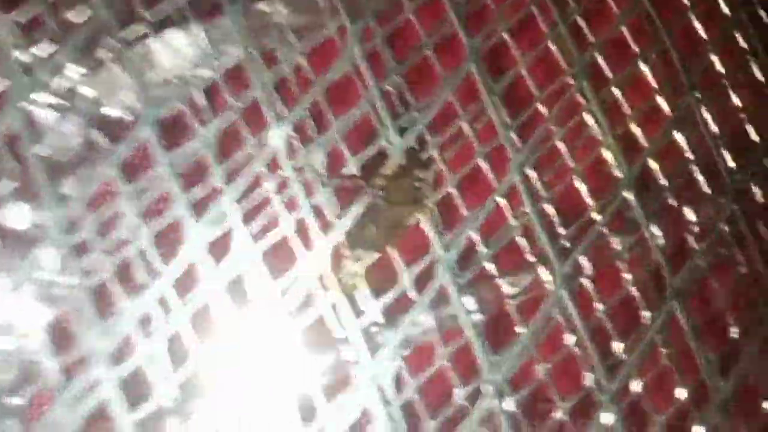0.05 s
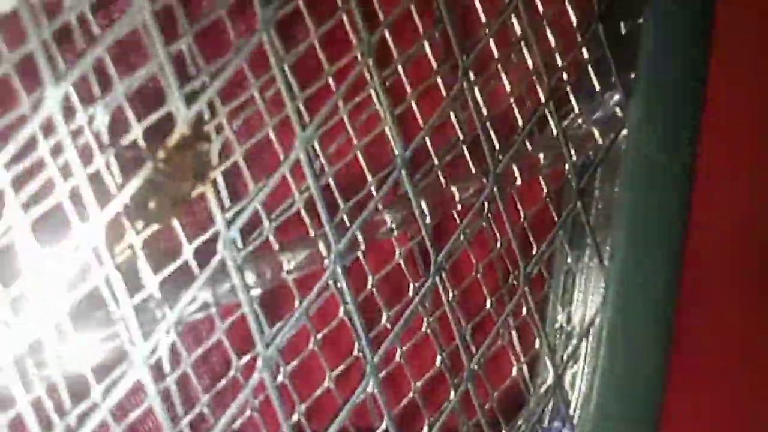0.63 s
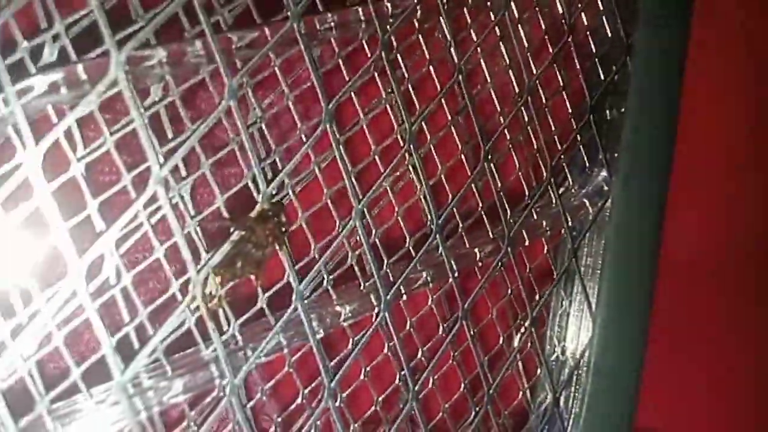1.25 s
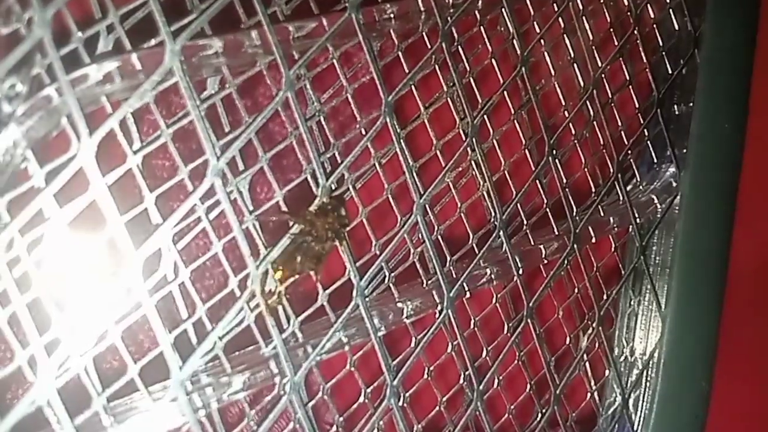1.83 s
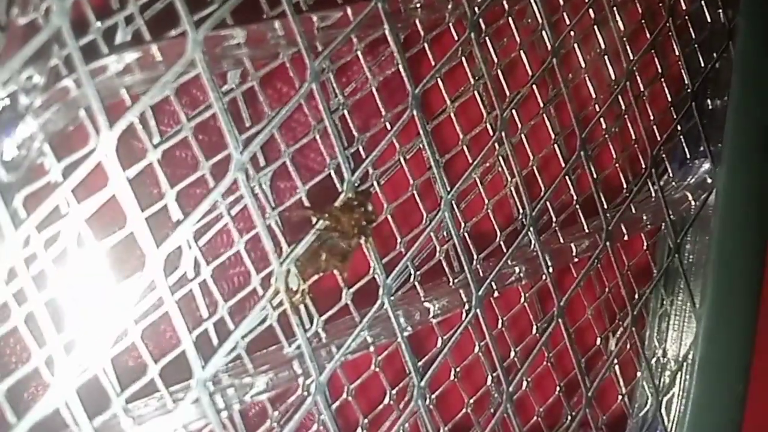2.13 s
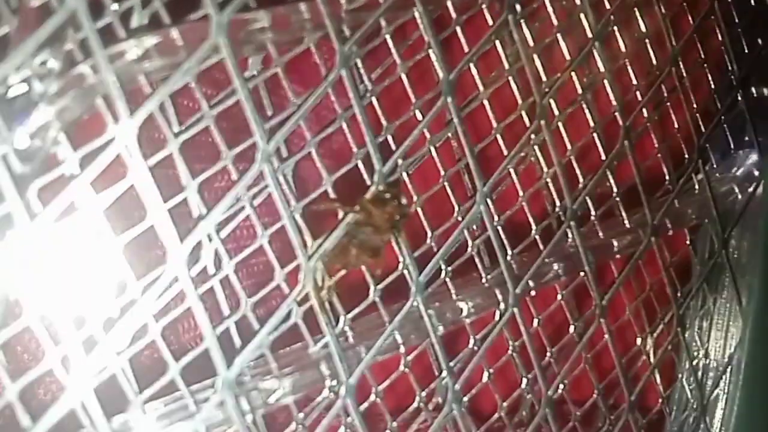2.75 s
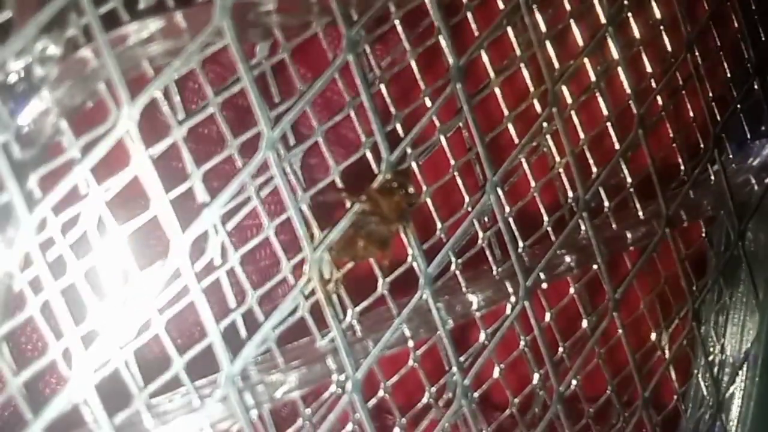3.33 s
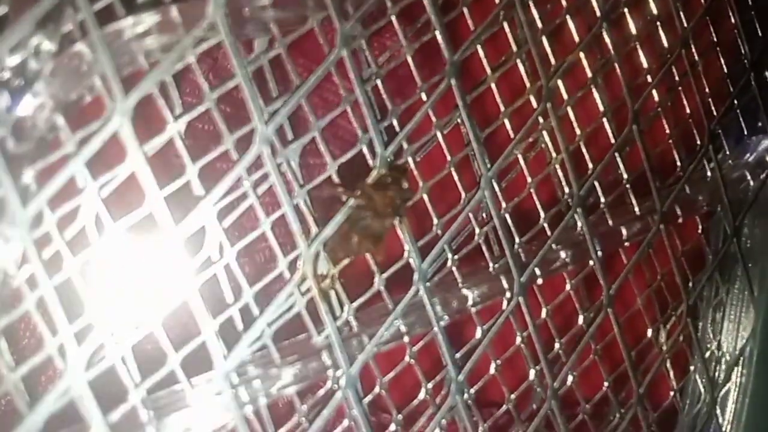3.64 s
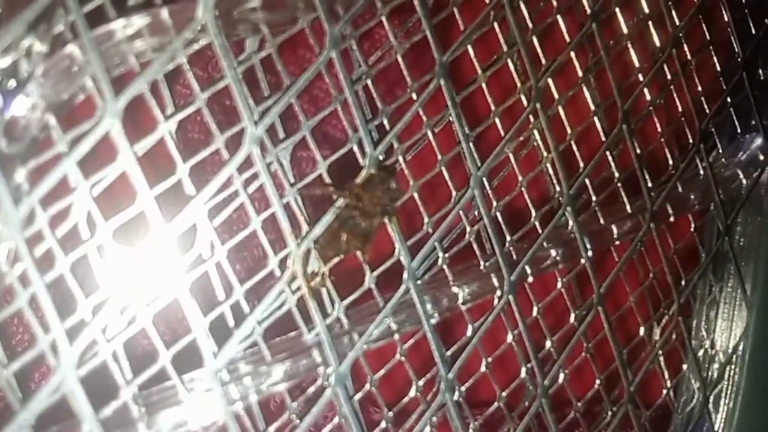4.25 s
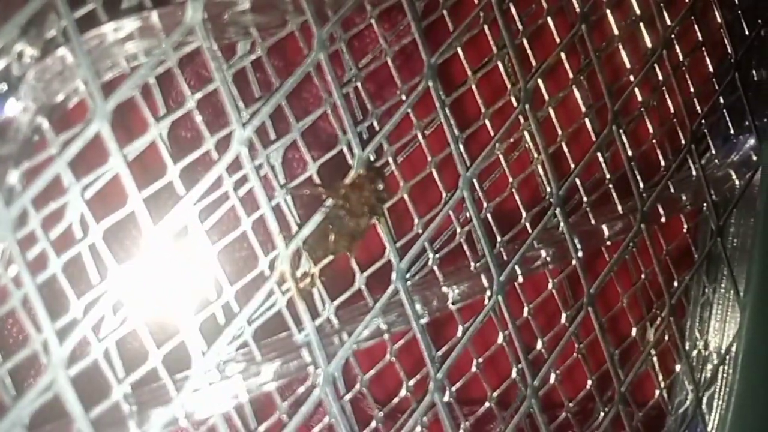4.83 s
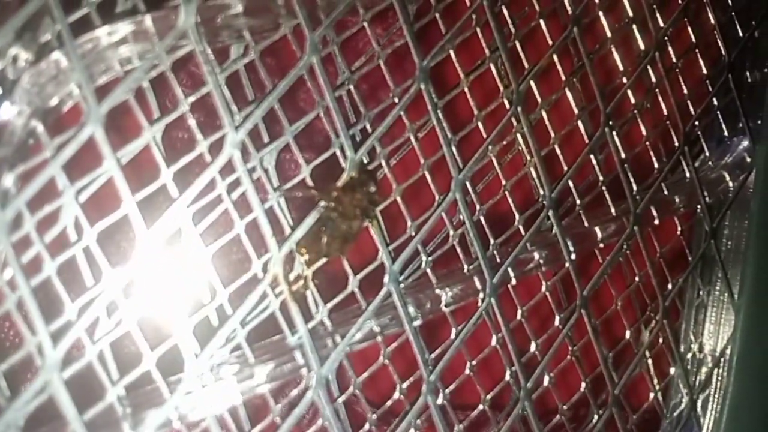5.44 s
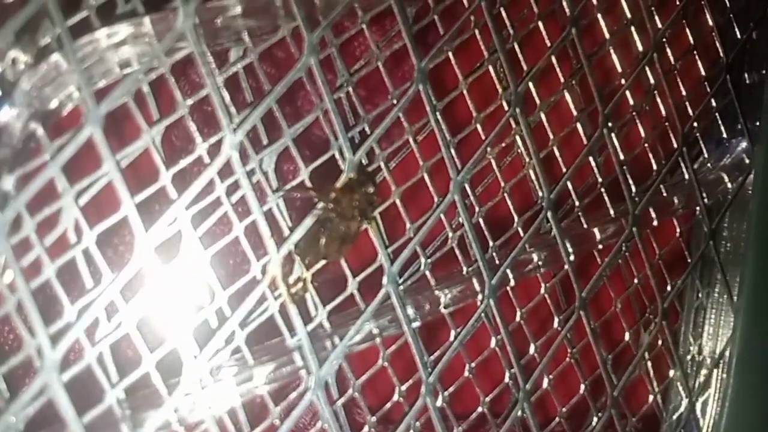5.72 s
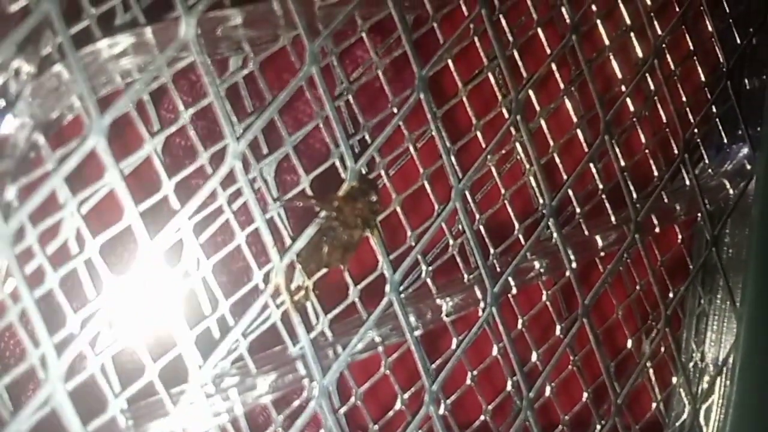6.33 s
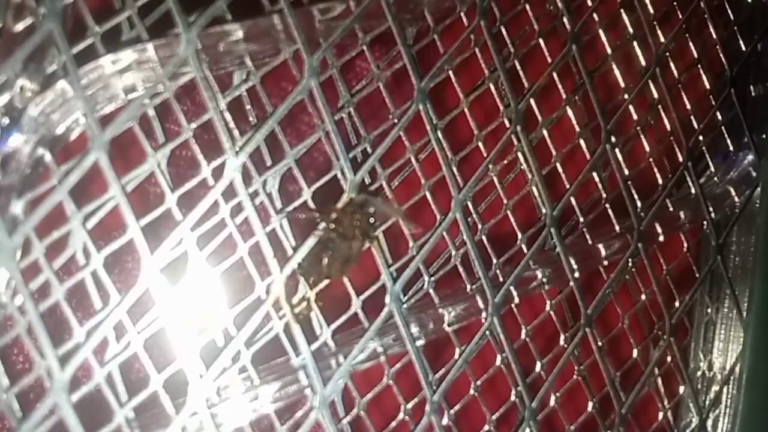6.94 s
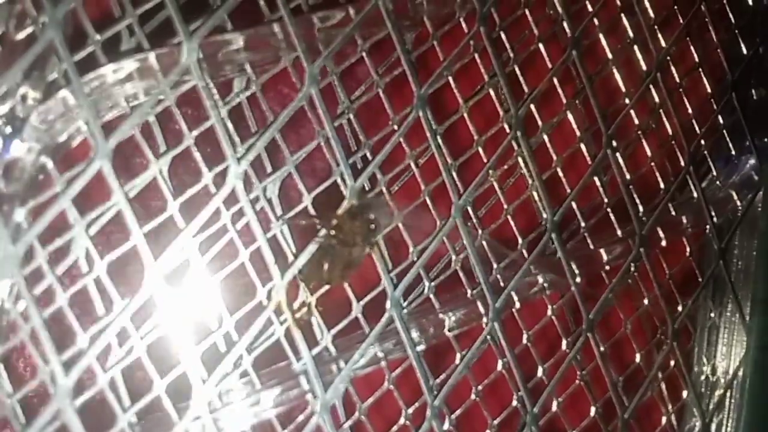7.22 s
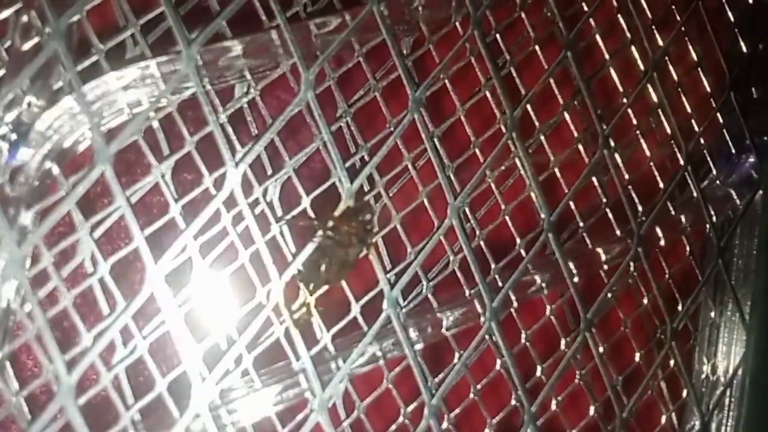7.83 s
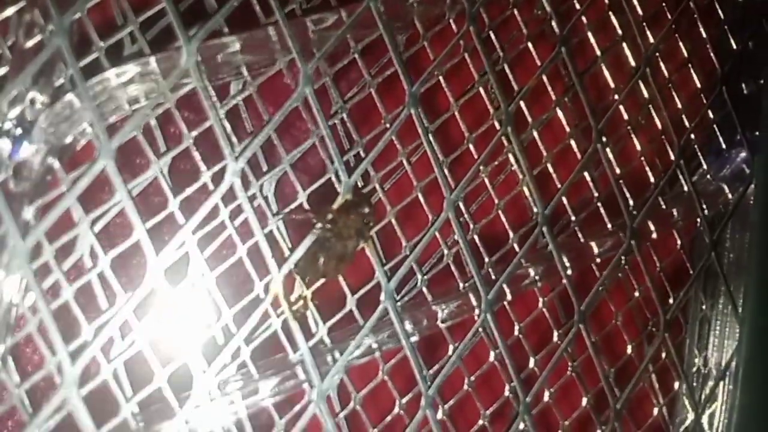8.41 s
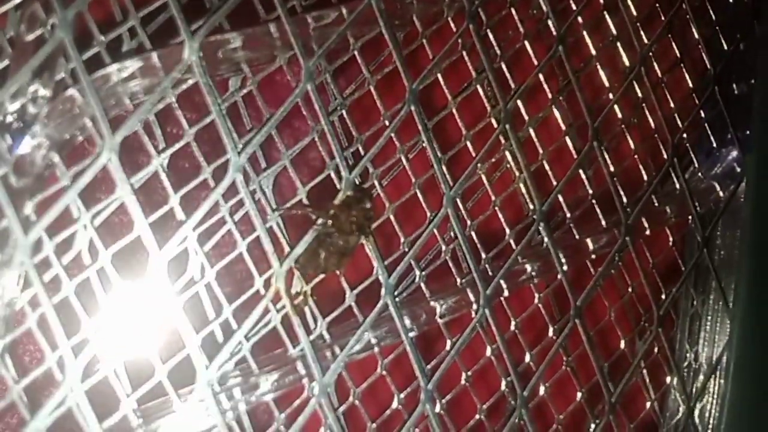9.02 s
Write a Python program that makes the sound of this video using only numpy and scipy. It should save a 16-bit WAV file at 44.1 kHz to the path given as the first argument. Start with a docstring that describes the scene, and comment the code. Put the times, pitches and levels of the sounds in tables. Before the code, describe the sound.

An electric bug swatter crackles and snaps sharply through a trapped insect, stops briefly, then sputters again over a faint fan hum.

```python
"""Sharp, uneven crackling: an electric swatter arcs through a trapped insect, a hand's width from a phone.
Each spark is one click, coloured by the racket and the microphone opening, then echoed by a small room.
Between the loud sparks the arc sputters weakly, as fast as the wire grid recharges. The hardest snaps
overload the microphone, which recovers with a low thump. A fan hums in the background."""
import sys
import numpy as np
from scipy import signal
from scipy.fft import rfft, irfft
from scipy.io import wavfile

SR = 44100
rng = np.random.default_rng(int(sys.argv[2]) if len(sys.argv) > 2 else 0)


def wrap_up_sound(samples):
    """Save the sound to the file named by the first command line argument, as 16-bit audio."""
    columns = np.atleast_2d(samples).T
    # keep every value between -1 and 1, then stretch to whole-number steps
    tamed = np.clip(columns, -1, 1)
    steps = np.round(tamed * 32767).astype(np.int16)
    wavfile.write(sys.argv[1], SR, steps)


N = 399987
SIZE = 16384  # samples in one short sound, such as a crack or its echo

# The tone of the room noise. Each row: frequency in Hz, relative level in dB.
ROOM_NOISE = [(25, -46), (50, -30.5), (80, -5), (165, -9.5), (205, -14), (330, -11), (410, -19.5),
              (470, -13), (700, -12.5), (820, -21), (960, -18.5), (1150, -22.5), (3000, -29.5),
              (3800, -34.5), (5200, -51), (8000, -57), (9500, -72)]
# The fan's steady hum. Each row: pitch in Hz, level in dB.
FAN_TONES = [(85, -76.5), (119, -53.5), (162, -52), (254, -51.5)]
# The fan's drone shifts between two pitches. Each row: time in seconds, then the levels of the
# lower and the upper pitch in dB.
DRONE_LEVELS = [(0, -51.5, -57), (3, -54.5, -65), (5, -47.5, -52), (5.5, -47.5, -50), (7.15, -46.5, -57),
                (7.45, -55, -51.5), (9.07, -49.5, -48.5)]
# The broad tone of a spark at the microphone. Each row: frequency in Hz, relative level in dB.
CRACK_COLOUR = [(40, -55), (400, -8.5), (850, 0), (1150, -1), (2200, 10), (3700, 11), (5000, 5.5),
                (6500, 3), (7800, -1.5), (9000, -17.5), (12000, -24.5), (15300, -50)]
# Peaks and dips from the racket frame and microphone opening. Each row: centre in Hz, width in Hz,
# boost or cut in dB.
FRAME_PEAKS = [(1425, 530, 7.5), (1863, 280, -7), (2410, 940, 4.5), (2656, 132, -10), (3042, 347, -3),
               (3620, 120, 7), (3886, 220, 4.5), (4580, 640, 7), (5550, 160, -11), (6320, 830, 4),
               (6980, 110, -11), (8340, 81, -26), (8690, 190, 7.5), (9690, 380, 12), (10850, 560, -8.5),
               (11240, 230, 14.5), (13400, 800, 25), (15140, 710, 12)]
# Resonances of the frame and opening that smear a click. Each row: centre in Hz, width in Hz.
SMEAR_BANDS = [(1865, 380), (4170, 5500), (3060, 600), (5760, 650), (7120, 640), (9280, 680), (12200, 2000)]
# The wire grid rings after a spark. Each row: pitch in Hz, seconds to fade by 60 dB, energy in dB.
GRID_TONES = [(2297, 0.089, -24), (3032, 0.05, -19.5), (3257, 0.018, -21), (3140, .05, -38),
              (3556, 0.041, -29.5), (3950, 0.06, -19.5), (4410, 0.066, -22), (7610, 0.022, -28)]
# The tone of the reflected sound. Each row: frequency in Hz, relative level in dB.
ECHO_COLOUR = [(40, -24), (700, -12), (1200, -12), (2400, -0.5), (3500, 3.5), (4550, -2), (5150, -11),
               (6400, -11.5), (7500, -16), (9000, -23), (11000, -27), (13000, -24), (15300, -23)]
# Echoes from nearby surfaces. Each row: delay in seconds, relative level in dB.
NEAR_ECHOES = [(.0026, -23), (.0061, -25), (.0072, -22.5), (0.0211, -35)]
# Two resonances of the racket. Each row: centre in Hz, width in Hz.
RACKET_RINGS = [(3830, 550), (4500, 390)]
# These change as the phone moves around the racket. Each row: time in seconds, then the boost or
# cut of the lower and the upper resonance in dB.
RING_BOOSTS = [(0, -1.5, 2.5), (.5, -1.5, -2), (1, 2, -4.5), (2.2, 3.5, 0.8), (3, -3.5, 3.5),
               (4.6, -1.5, 3), (9, 0, 1.5)]
# Spells of weak sparking. Each row: start in seconds, end in seconds, recharge time in seconds,
# relative energy in dB.
SPUTTER_SPELLS = [(0.103, .13, 0.025, -23), (0.578, .65, 0.02, -16.5), (.972, 1.015, .021, -8),
                  (1.605, 1.68, 0.027, -23), (1.965, 2.085, 0.028, -14), (2.42, 2.465, 0.02, -9),
                  (2.538, 2.67, 0.044, -4), (3.77, 3.812, 0.035, -9), (5.972, 6.16, 0.016, -15),
                  (6.228, 6.32, 0.024, -10), (8.062, 8.294, .02, -9), (8.334, 8.49, 0.02, -9),
                  (8.535, 8.78, 0.015, -6.5), (8.817, 8.985, .022, -7)]
# Loud sparks through the insect. Each row: start in seconds, relative energy in dB.
LOUD_SPARKS = [(0.0057, 6.5), (0.0458, 8), (0.166, 6), (0.2126, 7.0), (0.4162, -0.5), (0.6216, -0.5),
               (0.6605, 2.5), (0.6823, 0.5), (0.7083, 2.5), (0.739, 3), (0.7694, 5), (0.7954, 2),
               (0.9952, 0), (1.057, 0.5), (1.0844, 0), (1.1073, -4), (1.1372, -2), (1.2375, 1.5),
               (1.2765, 5.5), (1.3034, 3.5), (1.3337, 5.0), (1.3851, 8.5), (1.6962, -2), (1.7301, 2),
               (1.7794, 3.5), (1.816, 4.5), (1.867, 4.5), (1.9389, 1), (1.9998, -3.5), (2.0494, 1),
               (2.0963, 6.0), (2.1731, 3), (2.2303, 7.5), (2.2856, 1), (2.346, 5.5), (2.386, 5.5),
               (2.437, -1.5), (2.4865, 6), (2.5639, 3.0), (2.607, 4), (2.6751, 7), (2.7152, 6.5), (2.75, 7),
               (2.7861, 7.5), (2.82, 7.5), (2.897, 8), (3.028, 6), (3.114, 1.5), (3.1501, -0.5),
               (3.1931, 7), (3.25, 7.5), (3.2895, 6), (3.3298, 2.5), (3.4107, 0), (3.4598, 6), (3.6029, 10),
               (3.656, 9.0), (3.8249, 4.5), (3.8475, -0.5), (4.011, 3), (4.1057, 8), (4.425, 4.5),
               (4.4932, 2.5), (4.6468, -1), (4.7229, 6.5), (4.7905, 3.5), (4.8312, 7.0), (4.9362, 7),
               (4.9883, 7.5), (5.0617, 8), (5.1229, 1.5), (5.1561, 0.5), (5.1856, 2.0), (5.2236, 6.5),
               (5.323, -1), (5.3615, 2.5), (5.4238, -0.5), (5.4711, 1), (5.5037, 0.0), (5.5303, 0),
               (5.5555, 3.0), (5.6043, 2.5), (5.6361, 3.5), (5.7022, 2.5), (5.737, 5.5), (5.7724, 5.5),
               (5.8064, 4.5), (5.844, 4), (5.9135, 4.5), (5.9481, 6.5), (5.972, 3), (5.9964, -1),
               (6.0174, 1), (6.0501, 0.5), (6.07, -0.5), (6.0872, -2.5), (6.11, -2), (6.1306, 1),
               (6.1488, -1), (6.228, -0.5), (6.284, 8), (6.3755, -1), (6.4161, 6), (6.4695, 4.0),
               (7.9853, -3.5), (8.027, 1), (8.0614, -1), (8.1628, -0.5), (8.1994, 2), (8.2179, -4.5),
               (8.3742, 1.5), (8.5342, 2.5), (8.573, -0.5), (8.6144, -1.5), (8.631, -0.5), (8.668, -0.5),
               (8.6795, -1.5), (8.7085, -1.5), (8.7769, -1), (8.8556, -2.5), (8.8766, -3), (8.9002, -4.5),
               (8.9705, -4), (9.0104, 3.5), (9.0471, -2)]
# Sparks hard enough to overload the microphone, a few of them full discharges. Each row: start in seconds,
# relative crack energy in dB, # strength of the microphone overload, strength of the blast, blast length in
# seconds.
HARD_SPARKS = [(0.2637, 4.5, 1.57, 0.59, 0.00037), (0.8766, -11, 1.9, 1.35, .00089),
               (0.925, -2, 0.055, 1.84, 0.00086), (1.4387, 9, .68, 0.09, 0.001),
               (1.483, -3, 0.54, 1.46, 0.00095), (1.8977, 5, 1.8, 0.96, .001),
               (2.987, 7.5, 0.85, 0.11, .0006), (3.0692, 7.5, 0.94, .45, .00038),
               (3.3654, 6, 0.58, 0.08, 0.00076), (3.6927, 6, 0.71, 0.97, 0.0004),
               (3.8885, 8.5, 0.62, 0.065, 0.00085), (4.0637, 8.5, 0.6, 0.073, 0.00087),
               (4.7626, 8.5, 0.56, 0.052, 0.00065), (4.871, 8, .67, 0.074, 0.00091),
               (5.0223, 8, 0.62, 0.11, 0.00097), (5.2824, 6, 0.48, 0.052, 0.00093),
               (6.5168, 7, 0.95, .25, 0.00071)]


def undb(db):
    """Turn decibels into a number to multiply by."""
    return 10 ** (np.asarray(db) / 20)


def unit(x):
    """Scale a sound to an energy of one."""
    return x / np.sqrt(np.sum(x ** 2))


def fall(t60):
    """A fade that drops 60 dB in t60 seconds."""
    return np.exp(-np.log(1000) * np.arange(SIZE) / SR / t60)


def band(hz, centre, width):
    """How much of each frequency a resonance lets through."""
    return 1 / (1 + (2 * (hz - centre) / width) ** 2)


def contour(points, hz):
    """Join (Hz, dB) points into a curve on a log-frequency axis."""
    at, db = np.transpose(points)
    return np.interp(np.log(hz + 1), np.log(at), db)


def curves(table):
    """Turn rows of (time, values) into one gliding curve per value."""
    times, *columns = np.transpose(table)
    return [np.interp(np.arange(N) / SR, times, column) for column in columns]


def click(db):
    """The tightest click with this spectrum (minimum phase, made by folding the cepstrum)."""
    cepstrum = irfft(np.log(undb(db)))
    cepstrum[1:SIZE // 2] *= 2
    cepstrum[SIZE // 2 + 1:] = 0
    return irfft(np.exp(rfft(cepstrum)))


def add(track, start_s, sound):
    """Mix a sound into the track."""
    i = max(int(start_s * SR), 0)
    track[i:i + len(sound)] += sound[:max(N - i, 0)]


def play(times, gains, sound):
    """Play the same sound at each time, each with its own gain."""
    impulses = np.zeros(N)
    np.add.at(impulses, np.clip((times * SR).astype(int), 0, N - 1), gains)
    return signal.fftconvolve(impulses, sound)[:N]


def noise(gain):
    """Noise shaped by a gain per frequency, then scaled to a level of one."""
    x = irfft(rfft(rng.standard_normal(N)) * gain, N)
    return x / x.std()


def hum(pitch_hz, wobble_hz=5):
    """One steady fan tone that wavers a little."""
    drift = noise(band(np.fft.rfftfreq(N, 1 / SR), 0, wobble_hz))
    return np.sqrt(2) * np.sin(2 * np.pi * pitch_hz * np.arange(N) / SR + drift)


def background(air_db=-42.5, drone_hz=(546, 630), hiss_db=-81):
    """Soft room noise, the hum and drone of a fan, and a trace of thin hiss."""
    hz = np.fft.rfftfreq(N, 1 / SR)
    air = undb(air_db) * noise(undb(contour(ROOM_NOISE, hz)))
    fan = sum(undb(db) * hum(pitch) for pitch, db in FAN_TONES)
    drone = sum(undb(db) * noise(band(hz, pitch, width=38))
                for db, pitch in zip(curves(DRONE_LEVELS), drone_hz))
    hiss = undb(hiss_db) * noise(band(hz, centre=7200, width=350))
    return air + fan + drone + hiss


def chirp(pitch_hz=6020, width_hz=180, peak_db=-73, throb_hz=7.8):
    """A very faint, thin chirp that throbs about eight times a second."""
    throb = np.cos(np.pi * throb_hz * np.arange(N) / SR) ** 2
    return undb(peak_db) * throb * noise(band(np.fft.rfftfreq(N, 1 / SR), pitch_hz, width_hz))


def smear(sound):
    """Each resonance delays the frequencies near it, so a click swells over a few cycles."""
    hz = np.fft.rfftfreq(SIZE, 1 / SR)
    poles = np.prod([centre ** 2 - hz ** 2 + 1j * hz * width for centre, width in SMEAR_BANDS], axis=0)
    return irfft(rfft(sound) * poles.conj() / poles)


def surroundings(scatter_db=-17, scatter_t60=0.02, room_db=-14.5, room_t60=0.17, room_delay_s=0.003):
    """A click bounces off the hand, handle and nearby surfaces, then dies away in the room."""
    t = np.arange(SIZE) / SR
    colour = unit(smear(click(contour(ECHO_COLOUR, np.fft.rfftfreq(SIZE, 1 / SR)))))
    scatter, room = rng.standard_normal((2, SIZE))
    paths = undb(scatter_db) * unit(scatter * fall(scatter_t60) * (t > .001))
    paths += undb(room_db) * unit(room * fall(room_t60) * (t > room_delay_s))
    for delay, db in NEAR_ECHOES:
        paths[int(delay * SR)] += undb(db)
    return signal.fftconvolve(paths, colour)[:SIZE]


def thump(overload, release_s=0.0014, rise_s=0.0003, slowing_s=0.0019, bass_hz=88, q=0.83, leak_hz=50):
    """Overload pushes the microphone off centre, more slowly when hit hard, and it swings back."""
    t = np.arange(SIZE) / SR
    offset = -np.exp(-t / release_s) * (1 - np.exp(-t / (rise_s + slowing_s * overload ** 2)))
    s = 1j * np.fft.rfftfreq(SIZE, 1 / SR)  # frequency axis for the microphone's bass filter
    bass_cut = s ** 2 / (s ** 2 + s * bass_hz / q + bass_hz ** 2) * s / (s + leak_hz)
    swing = irfft(rfft(offset) * bass_cut)
    return 0.34 * overload * swing / np.abs(swing).max()


def spark_thumps(knee_db=6.5, steepness=2.28, max_gain=2.3, lag_s=0.00036):
    """The microphone's thump grows much faster than the spark that causes it, up to a limit."""
    times, db = np.transpose(LOUD_SPARKS)
    gains = np.minimum(undb(steepness * (db - knee_db)), max_gain)
    return play(times + lag_s, gains, thump(overload=0.23))


def grid_ring():
    """The grid wires ring faintly after a spark."""
    t = np.arange(SIZE) / SR
    return sum(undb(db) * unit(np.sin(2 * np.pi * hz * t) * fall(t60)) for hz, t60, db in GRID_TONES)


def crack():
    """A spark's sound straight to the microphone: a click with a very short ring."""
    hz = np.fft.rfftfreq(SIZE, 1 / SR)
    peaks_db = sum(db * band(hz, centre, width) for centre, width, db in FRAME_PEAKS)
    return unit(smear(click(contour(CRACK_COLOUR, hz) + peaks_db)))


def leakage(direct, quietest_db=-38, spread_db=6, linger_s=0.2):
    """Leaking charge makes one tiny tick after each loud spark."""
    times = np.transpose(LOUD_SPARKS)[0]
    wait, chance = rng.random((len(times), 2)).T
    db = quietest_db - spread_db * np.log(np.maximum(chance, .02))
    return play(times + linger_s * wait, undb(db), direct)


def sputter(jitter=.14, spread_db=0.5):
    """List the time and dB of weak sparks, each about one recharge time after the last."""
    loud_times = np.transpose(LOUD_SPARKS)[0]
    rows = []
    for when, end, recharge, db in SPUTTER_SPELLS:
        for wait, weakness in rng.standard_normal(size=(32, 2)):
            nearest = loud_times[np.argmin(np.abs(loud_times - when))]
            if abs(nearest - when) < recharge / 2:
                when = nearest  # a loud spark takes this charge
            elif when < end:
                rows.append((when, db - spread_db * weakness))
            when += recharge * np.exp(jitter * wait)
    return rows


def sparks(direct, arc_db=-12, sway_hz=0.836, dulling=0.56, neutral_db=1.0, dullest_db=3):
    """The crackle of loud and weak sparks jumping through the insect."""
    times, db = np.transpose(list(LOUD_SPARKS) + sputter())
    gains = undb(db)
    out = play(times, gains, direct + grid_ring())
    # weak sparks get more midrange, so they sound duller than strong ones
    mids = irfft(rfft(direct) * band(np.fft.rfftfreq(SIZE, 1 / SR), centre=1900, width=2000))
    boost_db = np.minimum(dulling * (neutral_db - db), dullest_db)
    out += play(times, gains * (undb(boost_db) - 1), mids[:SIZE // 2])
    # the hand sways, so the echoes blend slowly between three patterns
    for pattern in range(3):
        share = (1 + np.cos(2 * np.pi * (sway_hz * times + pattern / 3))) / 3
        out += play(times, gains * share, surroundings())
    # every arc takes its own path, which changes its tone a little
    arcs = np.zeros(N)
    fade = unit(np.exp(-np.linspace(0, np.pi, SIZE // 512)))
    for when, gain, path in zip(times, gains, rng.standard_normal(size=(256, len(fade)))):
        add(arcs, when, gain * undb(arc_db) * path * fade)
    return out + signal.fftconvolve(arcs, direct)[:N]


def blast(length_s, front_s=.000085, suction=0.41, rear=0.64, port_hz=2700, width_hz=700, port_db=-2):
    """A pressure wave (shock, suction, closing shock) rings the microphone opening, or port."""
    t = np.arange(SIZE // 32) / SR - 2 * front_s
    hz = np.fft.rfftfreq(SIZE // 32, 1 / SR)
    shocks = np.exp(-(t / front_s) ** 2) + rear * np.exp(-((t - length_s) / front_s) ** 2)
    wave = shocks - suction * np.sqrt(np.abs(np.sin(np.pi * np.clip(t / length_s, 0, 1))))
    port = 1j * hz * width_hz / (port_hz ** 2 - hz ** 2 + 1j * hz * width_hz)
    return wave + undb(port_db) * irfft(rfft(wave) * port)


def snaps(direct, echo_db=8, echo_db_per_blast=1.0, lead_s=0.00023):
    """The hardest sparks: a crack, a strong echo from the room, a deep thump and a pressure wave."""
    times, db, overloads, strengths, lengths = np.transpose(HARD_SPARKS)
    out = play(times, undb(db), direct + grid_ring())
    echo_gains = undb(echo_db + echo_db_per_blast * strengths)
    out += play(times, echo_gains, surroundings(scatter_db=-10.5, room_t60=0.16))
    for when, overload, strength, length_s in zip(times, overloads, strengths, lengths):
        add(out, when, thump(overload))
        add(out, when - lead_s, strength * blast(length_s))
    return out


def swatter():
    """All the discharges, coloured by the racket's changing resonances, plus the microphone's thumps."""
    direct = crack()
    out = sparks(direct) + snaps(direct) + leakage(direct)
    hz, spectrum = np.fft.rfftfreq(N, 1 / SR), rfft(out)
    rings = sum((undb(db) - 1) * irfft(spectrum * band(hz, centre, width), N)
                for db, (centre, width) in zip(curves(RING_BOOSTS), RACKET_RINGS))
    return out + rings + spark_thumps()


def scene():
    """The swatter in front of the quiet room, in one channel."""
    return (swatter() + background() + chirp())[None]


def record(dry):
    """The phone rounds off the loudest peaks and cuts the treble above 15600 Hz."""
    rounded = dry / (1 + dry ** 6) ** (1 / 6)
    treble_cut = signal.ellip(10, .2, 85, 15600, fs=SR, output="sos")
    return signal.sosfilt(treble_cut, rounded)


dry = scene()
out = record(dry)
wrap_up_sound(out)
```